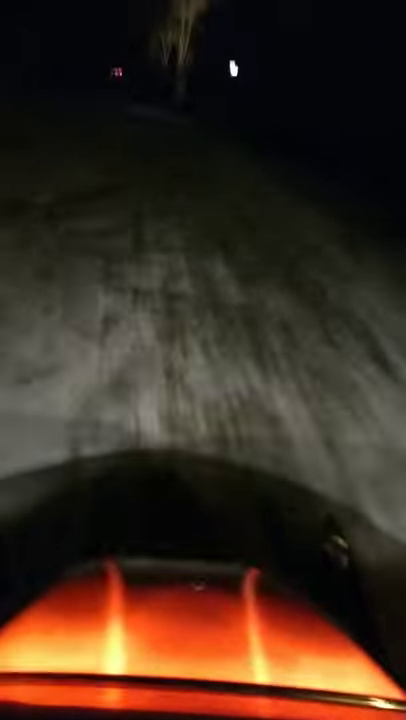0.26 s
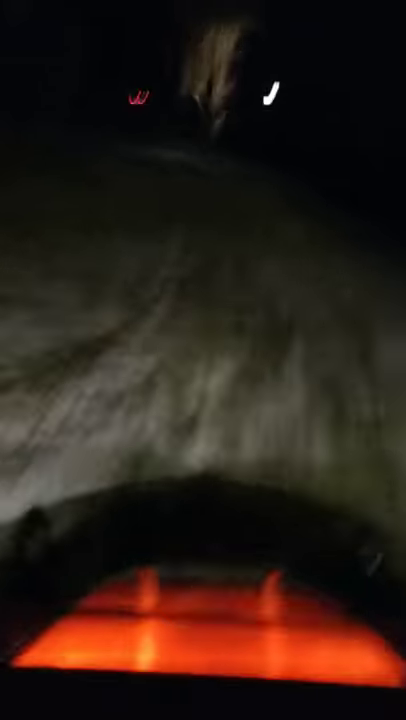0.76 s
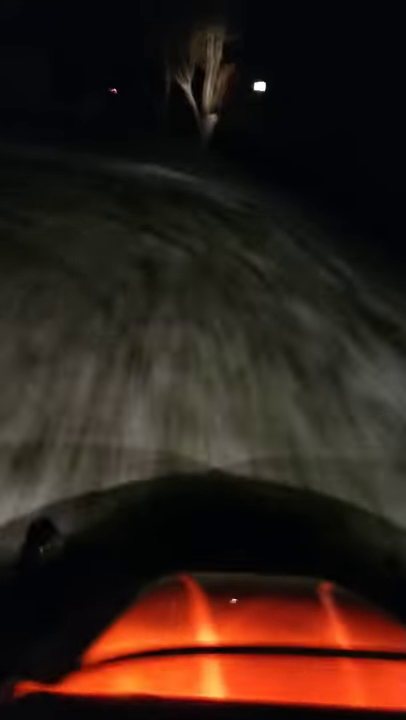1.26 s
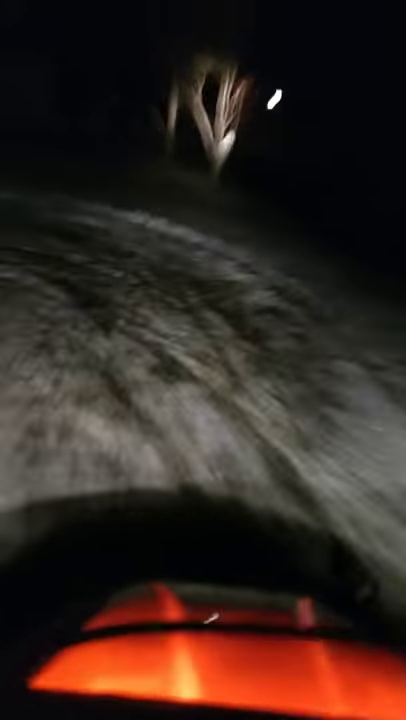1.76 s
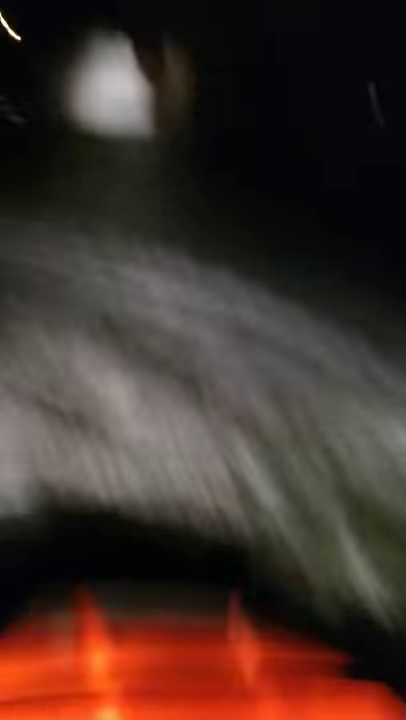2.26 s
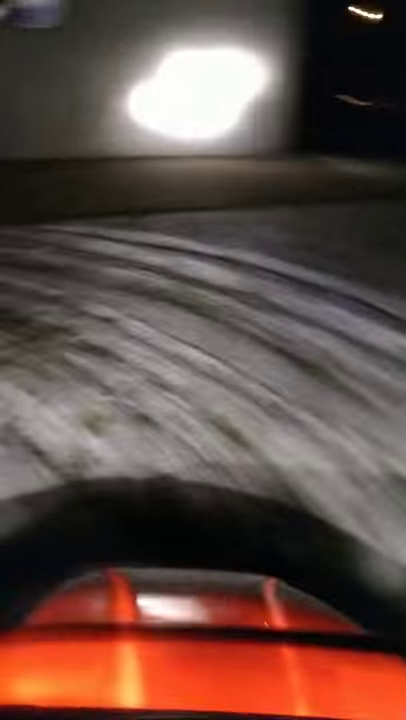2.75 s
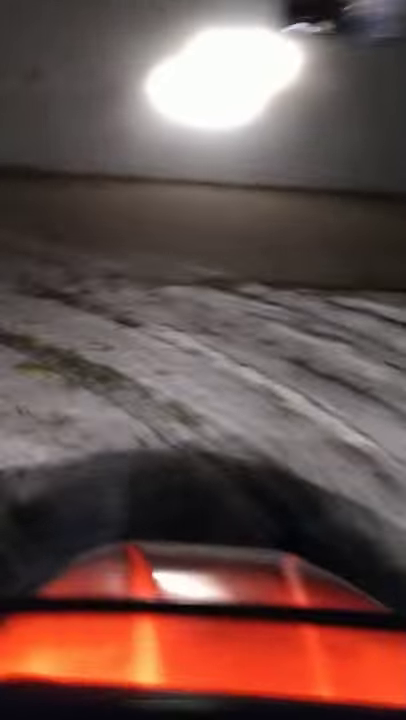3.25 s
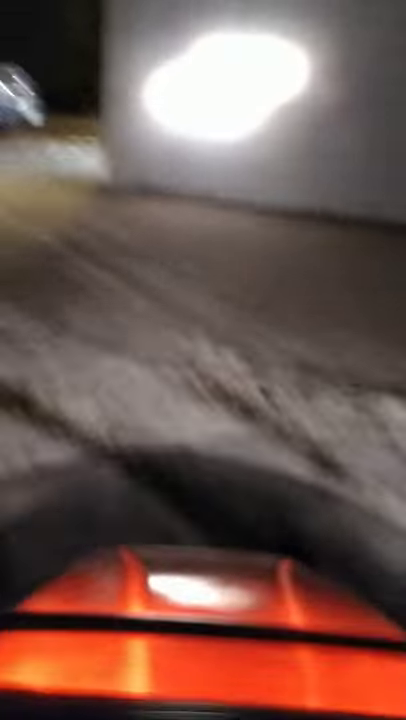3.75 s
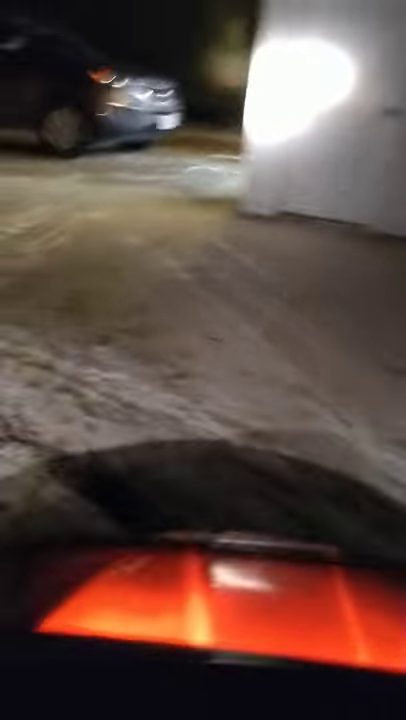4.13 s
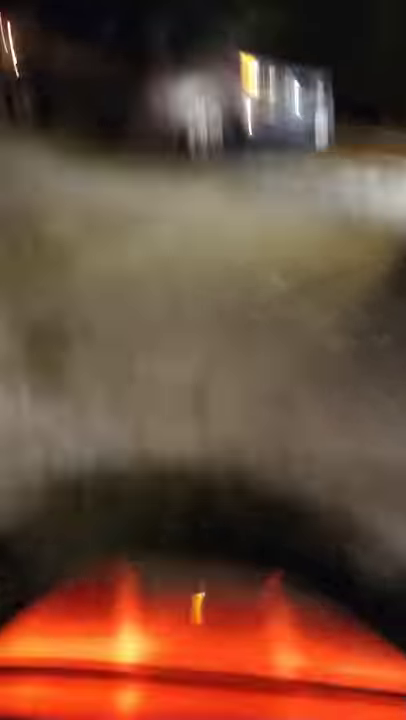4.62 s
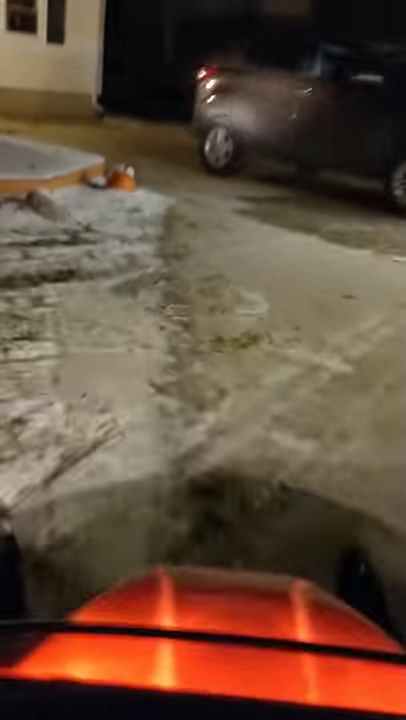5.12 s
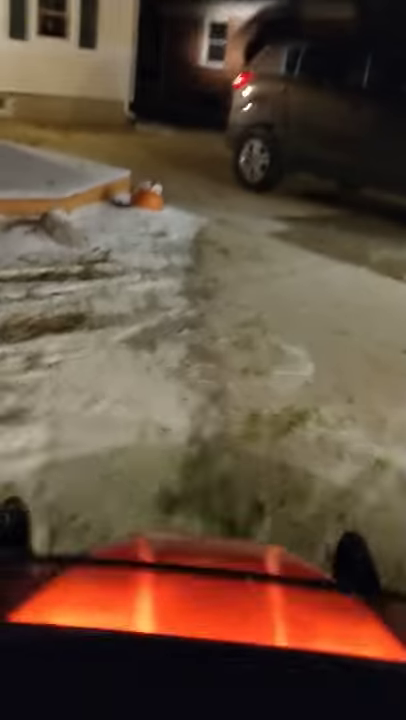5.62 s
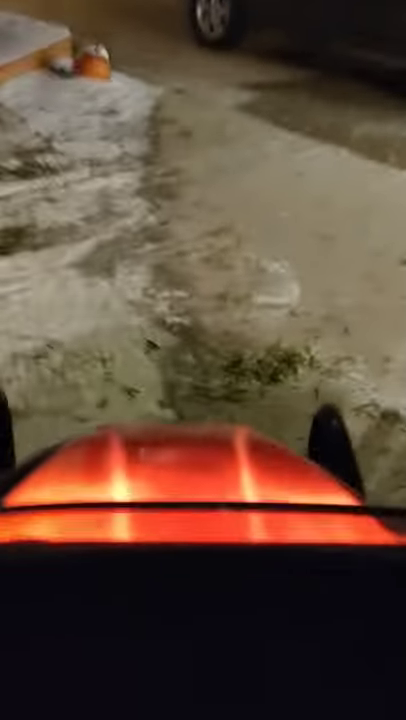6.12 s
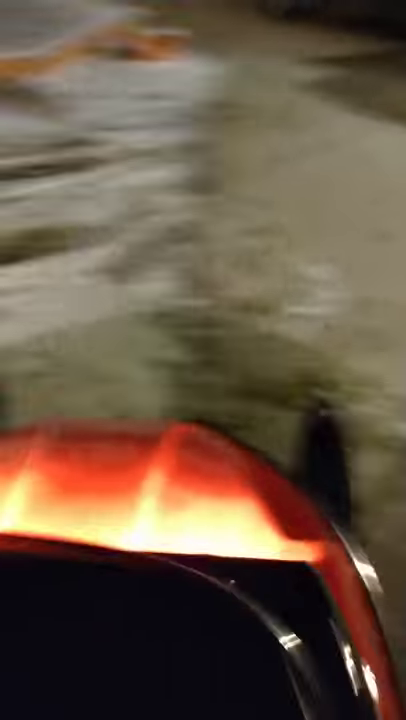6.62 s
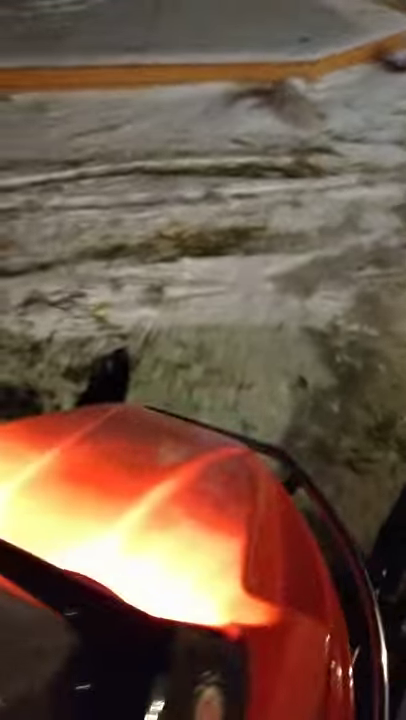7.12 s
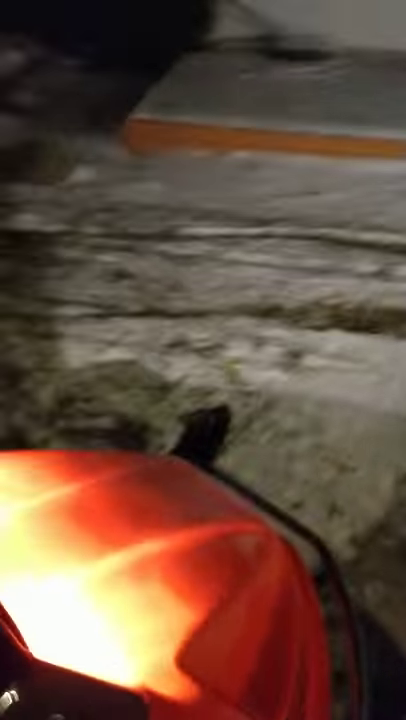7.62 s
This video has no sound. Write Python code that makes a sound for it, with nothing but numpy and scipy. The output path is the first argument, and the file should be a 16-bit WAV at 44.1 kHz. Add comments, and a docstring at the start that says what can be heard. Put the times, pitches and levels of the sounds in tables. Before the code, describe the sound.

Heard close from the saddle outdoors, a two-stroke snowmobile opens on a rising full-throttle drone with belt and fan hiss. The throttle shuts and the engine runs down, burning weakly with scattered hard pops, wind buffeting on the left. Four short blips bring back snarling drone, then a lumpy, popping idle remains. A phone-like microphone gives thin bass; the left side is thinner and later.

```python
"""A two-stroke twin snowmobile heard from the saddle: at first a clean full-throttle drone over belt and fan hiss.
The throttle shuts and the engine runs down in the wind, most cycles burning weakly and some catching hard.
Four throttle blips lift the crank and bring the drone back, then it settles into a lumpy idle.
Firings ring silencer and exhaust pipe as resonances; gas rasps in the cowling as noise puffed by each firing.
Two microphone ports hear it; the left one is late, thin and in the wind."""
import sys
import numpy as np
from scipy import signal
from scipy.fft import rfft, irfft
from scipy.io import wavfile
from scipy.ndimage import uniform_filter1d

SR = 44100
rng = np.random.default_rng(int(sys.argv[2]) if len(sys.argv) > 2 else 0)


def dump(signal):
    """Clip the signal to [-1, 1] and save it as 16-bit WAV at the path in sys.argv[1]."""
    limited = np.clip(np.atleast_2d(signal).T, -1, 1)
    pcm = np.round(limited * 32767).astype(np.int16)
    wavfile.write(sys.argv[1], SR, pcm)


N = 347493


def undb(db):
    """Gain of a level in dB."""
    return 10 ** (np.asarray(db) / 20)


def unit(x):
    """Scaled to rms 1."""
    return x / np.sqrt(np.mean(x ** 2))


def noise():
    """White noise for the whole scene."""
    return rng.standard_normal(N)


def curves(table):
    """Every column after the first as a value per sample, in straight lines between rows."""
    s, *columns = np.transpose(table)
    return [np.interp(np.arange(N) / SR, s, c) for c in columns]


def ring(x, modes):
    """Sum of two-pole resonances of alternating sign, as of a hollow body."""
    total = 0
    for k, (hz, width, db) in enumerate(modes):
        resonance = signal.lfilter(*signal.iirpeak(hz, hz / width, SR), x)
        total = total + (-1) ** k * undb(db) * resonance
    return total


def lowpass(x, hz):
    """Gentle second-order treble cut."""
    return signal.lfilter(*signal.butter(2, hz, fs=SR), x)


def walk(rate):
    """Random wander of rms 1: a new level every 1 / rate s, smoothed twice."""
    k = int(SR / rate)
    steps = np.repeat(rng.standard_normal(N // k + 1), k)
    return unit(uniform_filter1d(uniform_filter1d(steps, k), k)[:N])


def impulses(s, size):
    """Clicks at times s, each shared between two samples."""
    at, out = np.asarray(s) * SR, np.zeros(N + 2)
    np.add.at(out, at.astype(int), size * (1 - at % 1))
    np.add.at(out, at.astype(int) + 1, size * (at % 1))
    return out[:N]


def fade(x, decay_s):
    """Each click dies away exponentially from its own height."""
    return signal.lfilter([1], [1, -np.exp(-1 / (decay_s * SR))], x)


def throttle(opens, shuts):
    """Throttle opening over time: 0 shut, 1 open, with short ramps."""
    t, open_s, shut_s = np.arange(N) / SR, 0.038, 0.028
    return np.clip((t - opens) / open_s, 0, 1) * np.clip(1 - (t - shuts) / shut_s, 0, 1)


# Crank speed while the belt ties it to the track. Each row: time in seconds, crank turns in Hz.
BELT_SPEED = [(0.0, 63.4), (0.24, 69.0), (0.42, 77.0), (0.57, 82.8), (0.74, 88.2), (0.77, 87.9),
              (0.9, 77.5), (1.1, 67.3), (1.23, 61.9), (1.56, 54.8), (1.91, 49.6), (2.57, 42.6),
              (3.25, 35.0), (3.33, 35.3)]
# Throttle blips. Each row: opens in seconds, shuts in seconds, crank climb in Hz per second,
# even-burning share (0-1) at opening, the same at shutting, loudest moment in seconds, drone there in dB
# before pipe colour, lift of boom in dB, of bark in dB at the loudest moment, of rasp in dB,
# time constant of the crank sinking afterwards in seconds.
THROTTLE_BLIPS = [(3.328, 3.555, 30.48, 0.15, 0.62, 3.52, -25, 1, 14, 2.5, .325),
                  (3.685, 3.875, 33.51, 0.14, 0.63, 3.82, -24, 4.5, 14.5, 5, .2),
                  (3.96, 4.155, 50, 0.45, 0.33, 4.055, -16.5, 2.5, 16.5, 7, .25),
                  (4.535, 4.805, 50, 0, 0.56, 4.72, -17.5, 3, 16, 6.5, .325)]


def crank():
    """Crank turns in Hz: tied to the track at first, then climbing evenly in each blip and sinking toward idle."""
    idle_hz = 28.8
    t, turns = np.arange(N) / SR, curves(BELT_SPEED)[0]
    for opens, shuts, gain, *_, lag_s in THROTTLE_BLIPS:
        climb = np.interp(opens, t, turns) + gain * (np.minimum(t, shuts) - opens)
        sink = np.exp(-np.maximum(t - shuts, 0) / lag_s)
        turns = np.where(t > opens, idle_hz + (climb - idle_hz) * sink, turns)
    return turns


# Hard firings. Each row: time in seconds, then relative levels: exhaust pop in dB, gas burst (rasp) in dB,
# the next stroke against this one in dB.
HARD_FIRINGS = [(0.936, -21, -18.5, -20), (1.368, -29, -21, -22), (1.596, -23, -27, -20),
                (1.692, 0, -18, -27), (1.856, -26, -19, -20), (1.993, -21, -18, -5), (2.026, -11, -29, -17),
                (2.167, -8, -24.5, -20), (2.32, 0, -19, -17), (2.462, -6, -20.5, -20),
                (2.594, -14, -19, -25), (2.713, -16, -26, -20), (2.805, -23, -20.5, -20),
                (2.865, -17, -22, -22), (2.989, -13, -22, -3), (3.091, -14, -22, -18),
                (3.156, -12, -21, -23), (3.27, -7, -20, -29), (3.348, 4, -19, -17), (3.378, -20, -38, -15),
                (3.408, -32, -30, -12), (3.433, -20, -26, -12), (4.342, -19, -19, -8),
                (4.364, -5, -40, -15), (4.509, -2, -32, -12), (4.973, 0, -23, -25), (5.146, -18, -24, -8),
                (5.304, -6, -24.5, 3.5), (5.4, -9, -28, -15), (5.507, 2, -20, -17), (5.612, -12, -36, -15),
                (5.668, 0, -28, -10), (5.719, -11, -36, -15), (5.799, 6, -22.5, -7), (5.856, -11, -43, -17),
                (5.918, 1, -32, -19), (5.967, -11, -17.5, -11), (6.087, -9, -46, -15),
                (6.169, -13, -19, -13), (6.226, -15, -43, -15), (6.34, 6, -24.5, -22),
                (6.389, -6, -30, -17), (6.462, -2, -35, -15), (6.51, 6.5, -21, -23),
                (6.592, 4.5, -24.5, -20), (6.684, 2, -19, -3), (6.8, 1, -28, -25), (6.851, -6, -20, -2.5),
                (6.906, -5, -33, -23), (6.974, -6, -32, 2), (7.028, -13, -33, -17), (7.08, -23, -36, -19),
                (7.131, -19, -46, 12), (7.165, -3, -35, -9), (7.255, -8, -49, -12), (7.272, -5, -38, 1),
                (7.322, -8, -35, -10), (7.375, 2, -26.5, -12), (7.43, -25, -57, -18),
                (7.496, -7, -38.5, 9.5), (7.565, -3, -34, -16), (7.622, -0.5, -38, 3.5),
                (7.674, -8, -39, 3), (7.724, -1, -37, 3), (7.777, -5, -37.5, -7), (7.813, -2.5, -48, 1),
                (7.848, -10, -42, -20), (7.866, -1, -35, -16)]


def firing_count(turns):
    """Two firings a turn; near idle every hard firing falls on a whole count."""
    count = np.cumsum(2 * turns) / SR
    at = (np.array(HARD_FIRINGS)[:, 0] * SR).astype(int)
    at = at[turns[at] < 33]  # only below 33 turns a second
    whole = np.round(count[at[0]]) + np.r_[0, np.cumsum(np.round(np.diff(count[at])))]
    return count + np.interp(np.arange(N), at, whole - count[at])


def firings(turns, even):
    """Clicks of port openings, of charges (weak ones scatter, one cylinder burns less) and of hard pops."""
    count = firing_count(turns)
    k = np.arange(1, int(count[-1]) + 1)
    s = np.interp(k, count, np.arange(N) / SR)
    at = (s * SR).astype(int)
    uneven = 1 - even[at]
    size_chance, time_chance = rng.standard_normal((len(k), 2)).T
    size = undb(uneven * 4.0 * size_chance - (1.5 + 3.0 * uneven) * (k % 2))
    # timing strays further at a slow crank
    strayed = s + .0005 * uneven * (30 / turns[at]) ** 2 * time_chance
    strayed = np.clip(strayed, 0, (N - 1) / SR)
    hard_s, pop_db, _, step_db = np.transpose(HARD_FIRINGS)
    nearest = abs(s - hard_s[:, None]).argmin(axis=1)
    pops = 0
    for n in range(2):  # the hard firing, then the next stroke
        pop_s = s[np.minimum(nearest + n, len(s) - 1)]
        pops = pops + impulses(pop_s, undb(pop_db + n * step_db))
    return impulses(s, undb(-4.5 * (k % 2))), impulses(strayed, size), pops


def gas_bursts(turns):
    """Envelope of the gas blown by hard firings, held briefly and dying away; the next stroke blows again."""
    hold_s, decay_s = .008, .007
    s, _, burst_db, step_db = np.transpose(HARD_FIRINGS)
    next_s = np.minimum(s + .5 / turns[(s * SR).astype(int)], (N - 1) / SR)
    first = impulses(s, undb(burst_db + 7.0))
    again = impulses(next_s, undb(burst_db + step_db + 7.0))
    return uniform_filter1d(fade(again + first, decay_s), size=int(hold_s * SR))


# The ride between blips and hard firings. Each row: time in seconds, then relative levels: silencer boom in dB,
# pipe bark in dB, cowling rasp in dB, fan hiss in dB; last, share of each charge that burns evenly (0-1).
SLOW_RIDE = [(0.05, -32, -22.5, -22, -34, 0.14), (0.33, -17, -25.5, -20.5, -35.5, 0.16),
             (0.53, -29, -15, -19, -34.5, 0.32), (0.74, -20, -23, -21.5, -34.5, 0.24),
             (0.81, -30, -34, -24.5, -35.5, 0.1), (0.96, -31, -30.5, -22, -35, 0),
             (1.3, -33.5, -31, -28, -35, 0.03), (1.9, -32, -33, -30, -35.5, 0.01),
             (2.5, -28, -27.5, -28, -35.5, 0.46), (3.3, -33, -29.5, -28, -35, 0.33),
             (4.3, -35.5, -31, -27, -35.5, 0.12), (5.05, -34.5, -30.5, -29, -37, 0.42),
             (5.6, -33, -27, -27, -35.5, 0.44), (6.4, -33, -29.5, -27.5, -36, 0.37),
             (6.96, -35, -31, -33.5, -38, 0.64), (7.88, -36, -29, -38.5, -41, 0.66)]


def ride():
    """Even share and four levels: the slow ride lifted by blips and by fuller cycles around hard firings."""
    t = np.arange(N) / SR
    boom_db, bark_db, rasp_db, hiss_db, even = curves(SLOW_RIDE)
    for opens, shuts, _, first, last, top_s, _, boom_up, bark_up, rasp_up, _ in THROTTLE_BLIPS:
        gate = throttle(opens, shuts)
        even = even + gate * (np.interp(t, [opens, shuts], [first, last]) - even)
        boom_db = boom_db + gate * boom_up
        bark_db = bark_db + gate * (bark_up - 33 * abs(t - top_s))  # sags 33 dB a second
        rasp_db = rasp_db + gate * rasp_up
    s, _, burst_db, _ = np.transpose(HARD_FIRINGS)
    bell = np.hanning(int(2 * 0.073 * SR))
    excess = undb(burst_db - rasp_db[(s * SR).astype(int)])
    swell = signal.fftconvolve(impulses(s, excess), bell, "same")

    def lift(share, late_s):
        """Swell in dB for a gain share per unit of burst over rasp, answering late."""
        return 20 * np.log10(1 + share * abs(np.roll(swell, int(late_s * SR))))

    boom_db = boom_db + lift(0.077, 0.033)
    # the outlet swells less than the pipe
    bark_db = bark_db + lift(0.11, 0.0033) * (1 - 0.13 * curves(RIDER_LEAN)[1])
    return np.clip(even, 0, 1), boom_db, bark_db, rasp_db + lift(0.13, .008), hiss_db


# Full-throttle drone on the firing rate. Each row: time in seconds, mean level of the firing tone in dB,
# of its second multiple in dB, of its third in dB.
FULL_DRONE = [(0, -17, -26.5, -17), (.15, -24, -24.5, -18), (.3, -12, -35, -20.5), (.42, -12, -26, -38),
              (.6, -15, -34, -28), (0.744, -16.5, -19, -53)]
# How the cowling colours the higher tones at full throttle. Each row: frequency in Hz, mean tone level in dB.
COWLING_BUZZ = [(480, -37), (600, -38), (700, -31), (800, -42), (950, -43), (1100, -37), (1400, -36),
                (1800, -40)]
# How the pipe under load colours the drone of a blip. Each row: frequency in Hz, gain in dB.
PIPE_LOADED = [(70, -12), (90, -13), (160, -10), (225, -1), (255, 0), (275, -3), (297, -12), (320, -1),
               (350, 2), (385, -3), (420, -3), (445, -8), (475, -20), (600, -17), (800, -22), (1000, -26)]


def full_throttle():
    """Opening of the long first pull, shutting at the end of its drone table."""
    return throttle(-1, FULL_DRONE[-1][0])


def drone(turns):
    """Wavering tones on the multiples of the firing rate while the throttle is open."""
    t, phase = np.arange(N) / SR, 2 * np.pi * firing_count(turns)
    waver_db, buzz_waver_db = 1, 4.5

    def tone(k, waver):
        return np.sqrt(2) * undb(waver * walk(20)) * np.sin(k * phase)

    full = 0
    for k, db in enumerate(curves(FULL_DRONE), start=1):
        full = full + undb(db) * tone(k, waver_db)
    for k in range(4, 12):
        buzz_db = np.interp(2 * k * turns, *np.transpose(COWLING_BUZZ))
        full = full + undb(buzz_db) * tone(k, buzz_waver_db)

    def blip_level(k):
        """Tones swell and die around the loudest moment; the two lowest sag far less."""
        level = 0
        for opens, shuts, _, _, _, top_s, db, *_ in THROTTLE_BLIPS:
            slope = np.where(t < top_s, 73, 95)  # dB a second, rising then falling
            sag_db = (1 if k > 2 else 0.15) * slope * abs(t - top_s)
            level = level + throttle(opens, shuts) * undb(db - sag_db)
        return level

    hz, db = np.transpose(PIPE_LOADED)
    blips = 0
    for k in range(1, 12):
        colour = undb(np.interp(2 * k * turns, hz, db))
        blips = blips + blip_level(k) * colour * tone(k, waver_db)
    return full_throttle() * full + blips


# Silencer resonances. Each row: frequency in Hz, width in Hz, relative level in dB.
SILENCER_MODES = [(140, 40.7, 5), (196, 86, -3)]


def silencer_boom(boom_db, even, fast, beats, port_pulses, tumble):
    """Even charges, port pulses and tumbling gas ring the silencer."""
    drive = (0.7 - 0.9 * fast) * even * beats + port_pulses + 2.0 * (1 - 0.077 * fast) * tumble
    # evenly burning high revs boom less
    return undb(boom_db + 8.0 - 13.6 * fast * (even > .15)) * unit(ring(drive, SILENCER_MODES))


# The pipe heard over the cowling. Each row: frequency in Hz, width in Hz, relative level in dB.
PIPE_MODES = [(237, 61, -4), (349, 40.7, 4.5), (395.6, 91, -0.5), (592, 51, -3.5), (721.5, 71, -5),
              (804, 270, -15.5)]
# The pipe heard close to its outlet. Each row: frequency in Hz, width in Hz, relative level in dB.
OUTLET_MODES = [(284.5, 34.5, 2.5), (338.7, 35, -3.5), (390, 70, -20.5), (573, 38, -5), (666, 66, -15),
                (939.4, 86, -7.5), (1260, 110, -18.5)]
# The rider leans out right. Each row: time in seconds, exhaust gain ahead of the left port in dB,
# share of the outlet in the bark (0-1).
RIDER_LEAN = [(0, -1.5, 0.24), (1, -2.5, 0), (5.2, -0.5, 0.16), (6.4, -0.5, 0.28), (6.8, -0.5, 0.6),
              (7.3, -2.5, 0.91), (7.88, -1.5, 0.91)]


def pipe_bark(bark_db, even, fast, beats, pops, port_pulses, tumble, burst):
    """Pressure pushes and gas noise ring the pipe, heard over the cowling or near the outlet."""
    near = curves(RIDER_LEAN)[1]
    opened = full_throttle() + sum(throttle(opens, shuts) for opens, shuts, *_ in THROTTLE_BLIPS)
    # with the throttle open the drone takes over the steady part of the charges
    push = undb(bark_db - 1.5 - 20.0 * opened) * unit(even * beats) + undb(4.5) * pops
    # a slow crank opens the port slowly, so the push is rounder
    push = fast * push + (1 - fast) * lowpass(push, 480.)
    outlet_pops = undb(1.0) * near * lowpass(pops, 1000.)
    gas = undb(bark_db + 6.5 - 7 * opened) * (port_pulses + tumble)
    blast = undb(2.0 - 0.7 * near) * burst * noise()
    flow = push + outlet_pops + gas + blast
    dip_hz, dip_width_hz = 482, 27.5
    over_cowling = signal.lfilter(*signal.iirnotch(dip_hz, dip_hz / dip_width_hz, SR), ring(flow, PIPE_MODES))
    at_outlet = undb(7.5) * ring(flow, OUTLET_MODES)
    return undb(18.5) * ((1 - near) * over_cowling + near * at_outlet)


# Cowling resonances. Each row: frequency in Hz, width in Hz, relative level in dB.
COWLING_MODES = [(1260, 526, -5), (1590, 43, 3.5), (1878, 240, 2), (2240, 180, 1.5), (2452, 73, 4),
                 (2940, 1200, -12.5), (3327, 60, -1), (3490, 1030, -14), (4073, 44, -5)]


def cowling_rasp(rasp_db, even, fast, beats, puffs, burst):
    """Puffs and bursts of gas noise ring the cowling; a steep treble cut, with a thin band of noise above it."""
    gas = noise()
    knock = (.15 + 1.7 * fast) * even * beats
    rasp = undb(rasp_db + 5.0) * unit(ring(puffs * gas + knock, COWLING_MODES))
    rasp = rasp + undb(-3.5) * unit(ring(gas, COWLING_MODES)) * burst
    # a hard firing also jolts the cowling once
    s, _, burst_db, _ = np.transpose(HARD_FIRINGS)
    rasp = rasp + undb(7.0) * ring(impulses(s, undb(burst_db)), COWLING_MODES)
    rasp = signal.sosfilt(signal.cheby1(6, 1, 4250., fs=SR, output="sos"), rasp)
    thin_band = unit(ring(noise(), [(5970, 2800, 0)]))
    return rasp + thin_band * (undb(rasp_db - 15.0 + 3.4 * fast) * puffs + undb(-16.0) * burst)


# Belt and fan hiss bands. Each row: frequency in Hz, width in Hz, relative level in dB.
FAN_BANDS = [(5800, 570, -6), (7500, 2200, -2), (8970, 1450, 8.5), (10920, 630, 8), (12840, 1700, 7),
             (14600, 1200, 3.5)]


def belt_and_fan_hiss(hiss_db, puffs, burst):
    """Bands of noise, each flickering alone, lightly pulsed by the firings; one row per port."""
    def air():
        return unit(sum(undb(0.58 * walk(18)) * ring(noise(), [band]) for band in FAN_BANDS))

    apart = 0.17  # share of the power that each port hears alone
    hiss = np.sqrt(1 - apart) * air() + np.sqrt(apart) * np.array([air(), air()])
    steady = undb(hiss_db + 5.0 + 1.28 * walk(30)) * unit(1 + 0.19 * puffs)
    return hiss * (steady + undb(-32.0) * burst)


def track():
    """Low steady rumble of track and chassis: one broad noise band."""
    return undb(-42.0) * unit(ring(noise(), [(97, 150, 0)]))


def engine():
    """Exhaust with track, and the upper sound (rasp and hiss) as it reaches either port."""
    turns = crank()
    even, boom_db, bark_db, rasp_db, hiss_db = ride()
    ports, beats, pops = firings(turns, even)
    ports, beats = unit(ports / np.sqrt(turns)), unit(beats / np.sqrt(turns))
    burst = gas_bursts(turns)
    fast = np.clip((turns - 40.) / 28., 0, 1)  # 0 at a slow crank, 1 at high revs
    # steady pulses at every firing, stronger the less evenly the charges burn and the faster the crank
    port_pulses = .62 * np.maximum(turns / 33, 1) ** .7 * (1 - even) * ports
    # unburnt gas tumbles through silencer and pipe as noise
    tumble = [(1 - even) * undb(1.2 * walk(25)) * noise() for _ in range(2)]
    # a puff of gas follows each firing
    puffs = 1.1 + .55 * unit(fade(beats, .005))
    boom = silencer_boom(boom_db, even, fast, beats, port_pulses, tumble[0])
    bark = pipe_bark(bark_db, even, fast, beats, pops, port_pulses, tumble[1], burst)
    rasp = cowling_rasp(rasp_db, even, fast, beats, puffs, burst)
    hiss = belt_and_fan_hiss(hiss_db, puffs, burst)
    return boom + bark + drone(turns) + track(), rasp + hiss


# Wind gusts. Each row: time in seconds, mean level in dB.
WIND_GUSTS = [(0, -49), (.3, -34), (.75, -23.5), (1.1, -33), (2.4, -38), (3.2, -38), (3.7, -36), (4.0, -54),
              (4.25, -31), (4.45, -40), (4.6, -52), (5.05, -43), (5.2, -34), (6.0, -35), (6.1, -53),
              (7.88, -62)]


def wind():
    """Low buffeting noise that comes and goes with the gusts."""
    band = [(104, 45, -6.5), (194, 170, -4.5)]
    buffeting = unit(ring(ring(noise(), band), [(124, 120, 0)]))
    return undb(curves(WIND_GUSTS)[0] + 2.2 * walk(17)) * buffeting


# Left port against the right. Each row: frequency in Hz, gain in dB, likeness (0-1), phase lead in radians
# before the port's delay.
LEFT_PATH = [(41, -2, 0.8, 3.9), (75, -9.5, 0.7, 2.4), (152, -13.5, 0.25, 3.6), (307, -13.5, 0.4, 0.53),
             (515, -9, 0.13, 2.8), (695, -6.5, 0.97, 1.1), (1100, -3, 0.8, 2.82), (2160, -2.5, 0.97, 2.885),
             (4400, -1, 1, 3.09), (8240, 0.7, 1, 2.62), (11700, -3.5, 0.6, 2.9), (15000, -8, 1, 2.9)]


def left_port(x):
    """The far port: late, turned in phase, thin, and partly reached by scattered sound."""
    lag_s, scatter_decay_s = 0.0004508, .04
    hz = np.fft.rfftfreq(N, 1 / SR)
    table_hz, *columns = np.transpose(LEFT_PATH)
    db, like, lead = (np.interp(np.log(hz + 1), np.log(table_hz), c) for c in columns)
    scatter = rfft(noise() * np.exp(-np.arange(N) / (scatter_decay_s * SR)))
    direct = like * np.exp(1j * (lead - 2 * np.pi * hz * lag_s))
    # only the phase of the scatter is kept
    path = direct + np.sqrt(1 - like ** 2) * scatter / abs(scatter)
    return irfft(rfft(x) * undb(db) * path, N)


def scene():
    """Engine at both ports, wind on the left one."""
    exhaust, upper = engine()
    left = left_port(exhaust * undb(curves(RIDER_LEAN)[0]) + upper[0]) + wind()
    return np.array([left, exhaust + upper[1]])


def record(dry):
    """The phone drops the deep bass, rounds the peaks and cuts the top."""
    x = signal.sosfilt(signal.butter(3, 62., "high", fs=SR, output="sos"), dry)
    rounded = np.tanh(0.79 * x) / 0.83
    return signal.sosfilt(signal.ellip(10, .2, 80, 15850, fs=SR, output="sos"), rounded)


dry = scene()
out = record(dry)
dump(out)
```